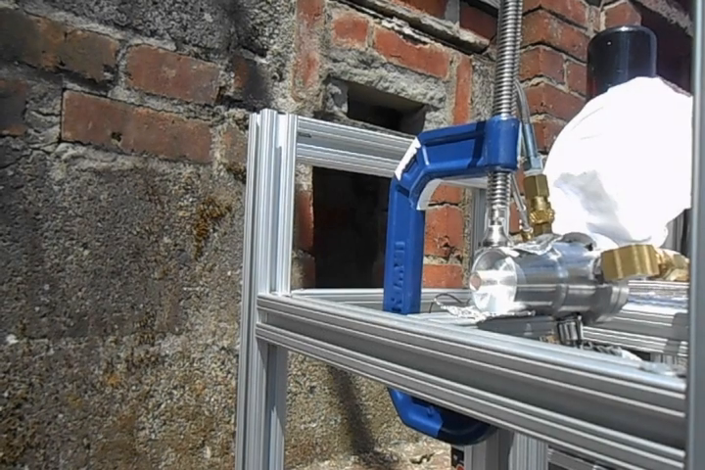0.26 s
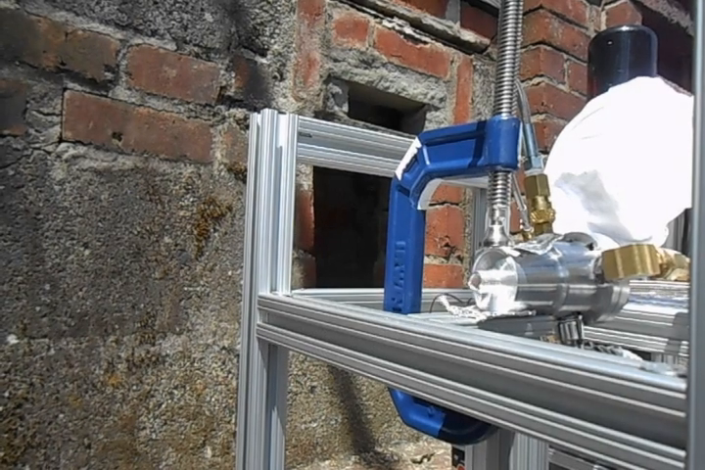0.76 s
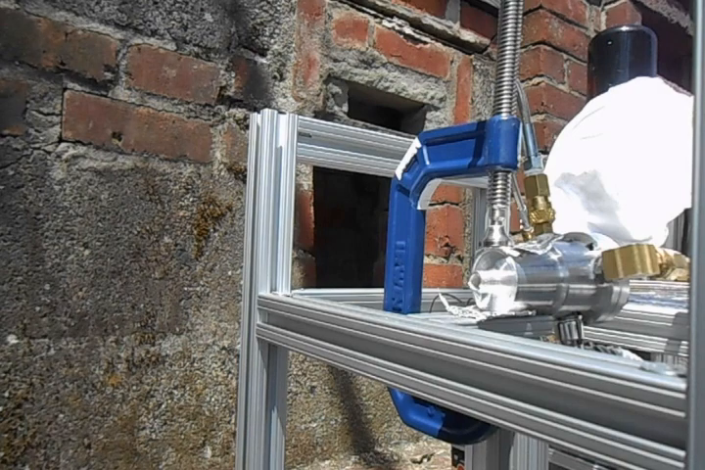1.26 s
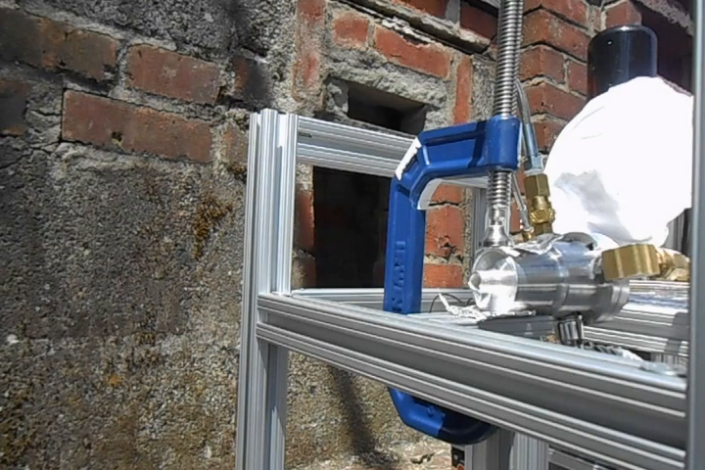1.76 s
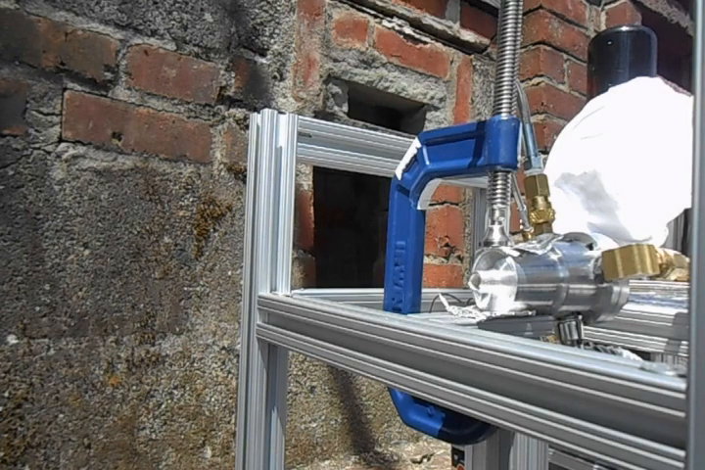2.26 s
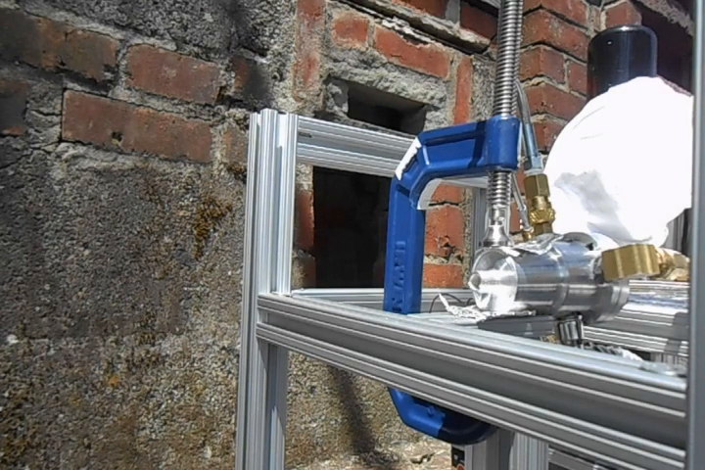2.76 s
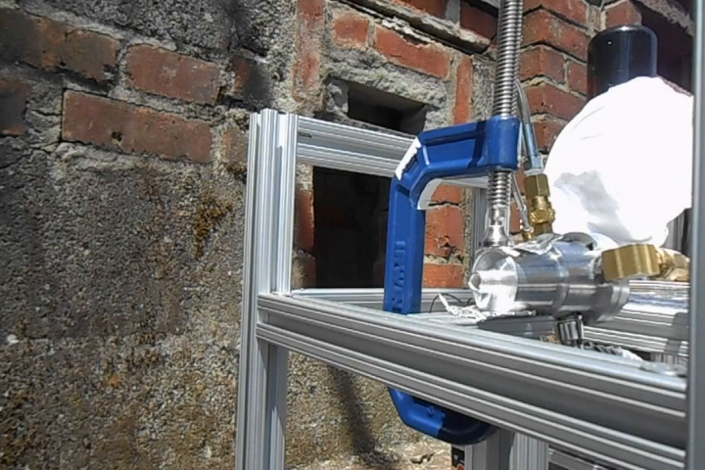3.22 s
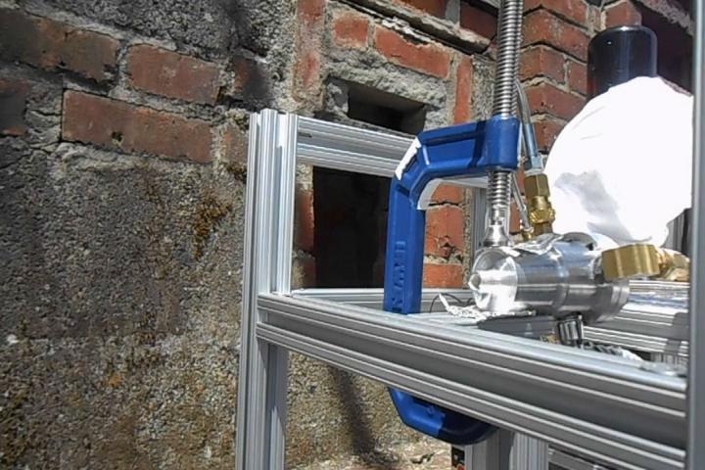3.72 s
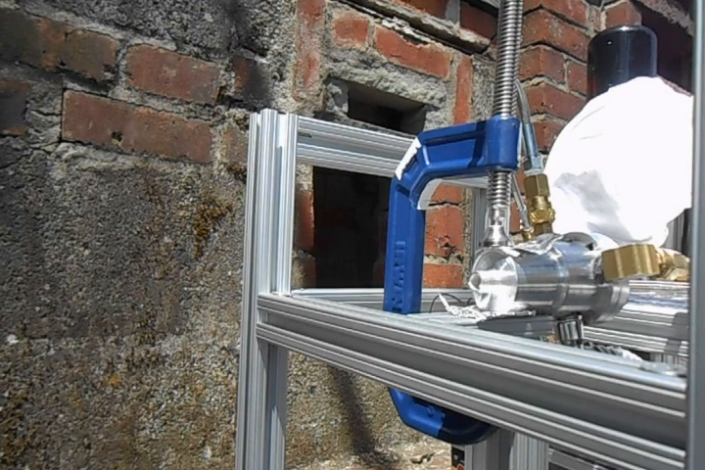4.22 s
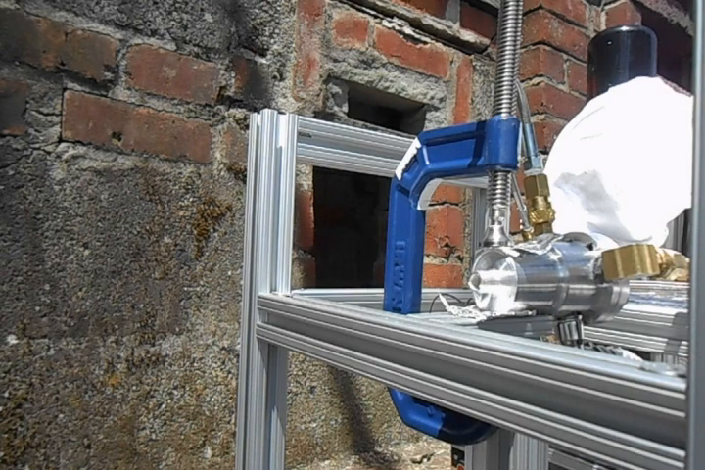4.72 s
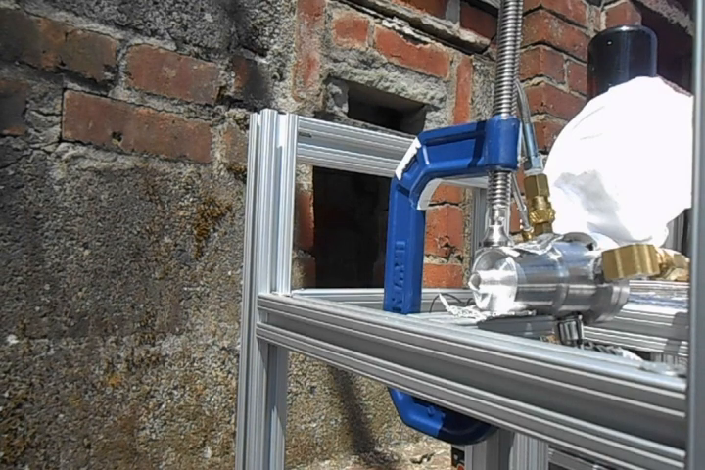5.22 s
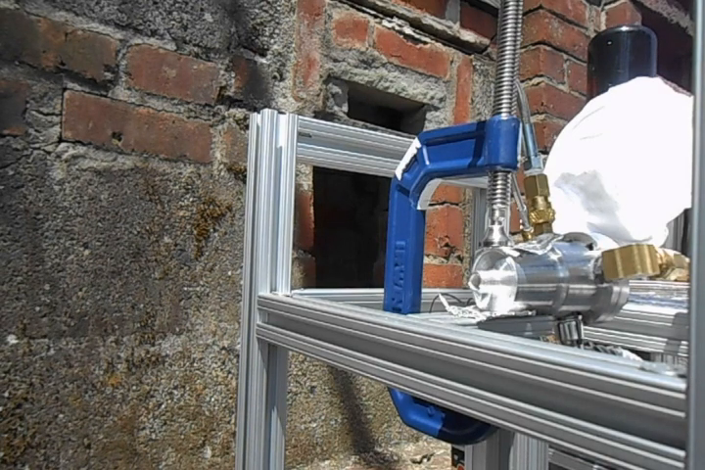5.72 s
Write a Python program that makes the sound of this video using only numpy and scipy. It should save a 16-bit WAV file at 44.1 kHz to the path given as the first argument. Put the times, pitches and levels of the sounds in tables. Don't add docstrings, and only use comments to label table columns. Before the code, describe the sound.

Outdoors, very close to a small gas igniter clamped to a metal frame. From 0 to 0.1 s a thin, bright electric spark buzzes steadily at a low rasping pitch over faint air noise. At 0.11 s a valve opens with a short hiss and chirp; at 0.14 s the gas lights with a thump and bursts into a loud, broadband roar, overloading the microphone. It brightens, then holds steady and harsh until about 1.2 s. From 1.25 to 1.5 s it narrows, growing rough, with piercing high whistles and spitting, and shuts. Near-silence follows; from 1.75 s distant wash and low wind swell back. A light pop at 2.0 s and a soft breathy sigh at 2.15 s precede clustered pops from 2.7 s. After 3.4 s, dry hollow knocks with a high chamber ring and gassy puffs repeat roughly every 0.2 s to the end at 6 s.

```python
import sys
import numpy as np
from scipy import signal
from scipy.fft import rfft, irfft
from scipy.io import wavfile

SR = 44100
rng = np.random.default_rng(int(sys.argv[2]) if len(sys.argv) > 2 else 0)


def rack_gain(trim_db):
    fader = np.asarray(trim_db, float)
    return 10 ** (fader / 20)


def materialize(psi):
    bounded = np.clip(np.atleast_2d(psi).T, -1, 1)
    quanta = np.round(bounded * 32767).astype(np.int16)
    wavfile.write(sys.argv[1], SR, quanta)


N = 263718
TIME = np.arange(N) / SR
BINS_HZ = np.maximum(np.fft.rfftfreq(N, 1 / SR), 1)
POP_LAG_S = .0017

# multiple_of_main_mode, blown_width_hz, blown_db, struck_db, t60_s
CHAMBER = [(.518, 60, -4, 0, 0.059), (.48, 90.5, -10, -3, 0.02), (.95, 60, -10.5, -3, 0.018),
           (1.0, 60, -0.5, 3, 0.038), (1.06, 50, -14, -6, 0.011), (1.245, 149, -16, 3, 0.035),
           (1.427, 149, -11, 5, .03), (1.5, 120, -10, 12, 0.015), (1.638, 130, -7, 3, 0.044),
           (1.957, 40, -45, -10, 0.03)]
# start_s, thud_db, thud_tilt_db_per_octave, low_mode_db, main_mode_db
POPS = [(2.016, -38.5, -3, -35, -44), (2.707, -33.5, -5, -35.5, -38), (2.807, -28, -9, -33, -36.5),
        (2.855, -47, -8, -46, -37), (2.901, -27.5, -9, -35, -36), (3.045, -24.5, -16, -30, -31.5),
        (3.124, -41, -10, -45, -33), (3.228, -24.5, -12, -34, -32), (3.309, -36, -4, -58, -43),
        (3.407, -22.5, -12, -26, -25), (3.619, -22.5, 5, -33, -27), (3.841, -21, 0, -36, -30.5),
        (4.037, -26, 7, -29.5, -32), (4.237, -25.5, -14, -29.5, -28), (4.442, -24, 3, -52, -26.5),
        (4.477, -44, 0, -42, -51), (4.648, -24.5, -6, -32.5, -39.5), (4.831, -24, -5, -30, -31),
        (5.056, -25, 0, -28, -31.5), (5.278, -22.5, 2, -34.5, -35), (5.479, -20.5, -11, -32, -32.5),
        (5.706, -23, -4, -33, -36.5), (5.747, -42, -2, -36, -55), (5.947, -20, -10.5, -31, -32.5)]


def rms_one(x):
    return x / np.sqrt(np.mean(x ** 2) + 1e-20)


def in_time(rows, outside=None):
    s, *columns = np.transpose(rows)
    return [np.interp(TIME, s, c, left=outside, right=outside) for c in columns]


def swell(s, length):
    return np.cos(np.pi * np.clip((TIME - s) / length, -.5, .5))


def drift(rate_hz):
    r = np.exp(-2 * np.pi * rate_hz / SR)
    wander = signal.lfilter([1], [1, -2 * r, r * r], rng.standard_normal(N + SR))
    return rms_one(wander[SR:])


def noise_bands(spectrum, peaks, edges_hz):
    hz, db = np.transpose(spectrum)
    shape_db = np.interp(np.log(BINS_HZ), np.log(hz), db)
    for centre_hz, width_hz, peak_db in peaks:
        shape_db = shape_db + peak_db / (1 + (2 * (BINS_HZ - centre_hz) / width_hz) ** 2)
    noise = rfft(rng.standard_normal(N)) * rack_gain(shape_db)
    below = [0] + [1 / (1 + (BINS_HZ / edge) ** 4) for edge in edges_hz] + [1]
    return [rms_one(irfft(noise * (high - low), N)) for low, high in zip(below, below[1:])]


def blown(hz, width_hz):
    turn = 2 * np.pi * np.cumsum(hz) / SR
    return drift(width_hz) * np.cos(turn) + drift(width_hz) * np.sin(turn)


def jet():
    # hz, level_db_per_hz
    jet_spectrum = [(21, -32), (35, -2), (143, -14.5), (282, -7.5), (368, -8.5), (542, -6), (597, -8),
                    (743, -7), (2010, -6.5), (3110, -2.5), (4470, 2), (6750, -6), (9020, -4.5),
                    (11500, -14), (15000, -47.5), (22000, -120)]
    # centre_hz, width_hz, level_db
    nozzle = [(4620, 460, 0), (6240, 150, 1), (8970, 440, 1)]
    edges_hz = [250, 2000, 8000]
    # time_s, level_db
    flow = [
        (0.137, -9.5),
        (0.245, -13),
        (0.549, -23),
        (1.203, -22.5),
        (1.331, -28),
        (1.411, -43),
        (1.465, -45.5),
        (1.489, -76.5),
        (1.525, -90),
    ]
    # centre_s, length_s, level_db
    coughs = [
        (1.425, 0.011, 9.5),
        (1.431, 0.013, -16),
    ]
    # centre_s, length_s, height
    surges = [
        (.1495, .003, -1.2),
        (.1865, .0075, -4.0),
        (.1912, .0055, 5.0),
        (.2132, .005, 2.0),
        (1.33, .02, .07),
        (1.345, .022, .09),
        (1.433, .03, -.035),
    ]
    cold_s, light_s = .114, .137
    rumble, roar, hiss, top = noise_bands(jet_spectrum, nozzle, edges_hz)

    filling = np.clip((TIME - cold_s) / (light_s - cold_s), 0, 1)
    cold = (cold_s, light_s, -30.5, -2.5, -12.5, 10 - 14 * filling)

    flow_db, = in_time(flow)
    early = np.exp(-np.maximum(TIME - light_s, 0) / 0.098)
    steady_db, starved_most_db = -25, 20
    starved_db = np.clip(steady_db - flow_db, 0, starved_most_db) * (TIME > 1)
    lit_db = flow_db - 0.5 + sum(db * swell(s, length) for s, length, db in coughs)
    lit_rumble_db = -11.5 + 14 * swell(.195, 0.06) + .3 * starved_db
    lit_roar_db = -6 + 6 * early + 0.36 * starved_db
    lit_top_db = 0.5 - 26 * early - 5.5 * starved_db
    lit = (light_s, flow[-1][0], lit_db, lit_rumble_db, lit_roar_db, lit_top_db)

    out = np.zeros(N)
    for start, end, hiss_db, rumble_db, roar_db, top_db in (cold, lit):
        mix = hiss * rack_gain(0.51 * drift(30))
        mix += rumble * rack_gain(rumble_db)
        mix += roar * rack_gain(roar_db + 0.5 * drift(20))
        mix += top * rack_gain(top_db + 0.73 * drift(30))
        out += ((TIME >= start) & (TIME < end)) * rack_gain(hiss_db) * mix
    for s, length, height in surges:
        out += height * swell(s, length) ** 2
    return out


def valve():
    # time_s, level_db, upper_mode_lead_db
    whistle = [
        (1.26, -30, -12.5),
        (1.272, -14, -9.5),
        (1.305, -21, 9.5),
        (1.412, -34, 2.5),
        (1.424, -12, -12),
        (1.435, -38, -14),
        (1.443, -29.5, -12.5),
        (1.466, -33, -14),
        (1.485, -78, 1),
    ]
    whistle_hz = [5470, 5810]
    # time_s, rate_per_s, level_db
    sputter = [
        (1.25, 200, -15),
        (1.33, 450, -12),
        (1.37, 450, -17),
        (1.41, 350, -25),
        (1.47, 200, -38),
    ]
    tone_db, lead_db = in_time(whistle)
    ring_db = -110 * np.maximum(TIME - whistle[-1][0], 0)
    tone_db = np.where(TIME < whistle[0][0], -150, tone_db + ring_db)
    low, high = (blown(hz + 7.0 * lead_db, 110.0) for hz in whistle_hz)
    modes = rack_gain(np.minimum(-lead_db, 0)) * low + rack_gain(np.minimum(lead_db, 0)) * high
    tone = rack_gain(tone_db - 5.0 + 3.7 * drift(50)) * modes

    per_s, spit_db = in_time(sputter, outside=-150)
    spits = (rng.random(N) < per_s / SR) * rack_gain(spit_db + 6.1 * rng.standard_normal(N))
    dull = signal.butter(1, 3000, fs=SR, output="sos")
    octave = 1.5 * tone ** 2
    return tone - octave - 3 * signal.sosfilt(dull, spits)


def spark():
    # pitch_hz, level_db
    partials = [(2051, -55), (2283, -60), (4107, -44), (4334, -57), (4565, -58), (4791, -58), (5023, -58),
                (5249, -54), (5480, -48), (5938, -48), (6164, -37), (6223, -63), (6390, -54), (6621, -43),
                (6848, -46), (7079, -55), (7300, -64), (7531, -59), (7763, -53), (7989, -53), (8215, -49),
                (8446, -54), (8672, -64), (8899, -65), (9130, -50), (9356, -57), (9588, -64), (9814, -52),
                (10045, -50), (10271, -56)]
    strike_hz, end_s = 228.3, .107
    multiple = np.arange(8, 49)
    level_db = -68 + 2.0 * rng.standard_normal(len(multiple))
    for hz, db in partials:
        near = multiple == round(hz / strike_hz)
        level_db[near] = np.maximum(level_db[near], db + hz / 2400)
    t = TIME[TIME < end_s]
    multiple = multiple[:, None]
    phase = np.pi + .012 * (multiple - 27) ** 2 + .8 * rng.standard_normal((len(multiple), 1))
    waves = np.sin(2 * np.pi * strike_hz * multiple * (t - .0005) + phase)
    tone = np.sqrt(2) * rack_gain(level_db) @ waves
    return np.pad(tone * np.minimum((end_s - t) / 0.0005, 1), (0, N - len(t)))


def crack_db(thud_db):
    return -31 + 0.56 * thud_db


def mode_hz(multiple):
    # time_s, pitch_hz
    cooling = [(1.5, 4415), (2.0, 4575), (2.7, 4478), (3.5, 4427), (4.5, 4386), (6, 4243)]
    fitting_hz = 4410.0
    return multiple * (in_time(cooling)[0] if multiple < 1.2 else np.full(N, fitting_hz))


def pops():
    # pitch_hz, level_db, t60_s
    stand = [(370.5, 0.5, 0.054), (450.7, -3.5, 0.098), (576, -8, 0.048), (623.3, -10, 0.092),
             (842, -18, 0.043)]
    out, t = np.zeros(N + SR), np.arange(SR // 8) / SR
    pitches = [mode_hz(row[0]) for row in CHAMBER]
    chance = rng.standard_normal((len(POPS), 2, len(stand) + len(CHAMBER)))
    puffs = rng.standard_normal((len(POPS), len(t)))
    rise = 1 - np.exp(-t / .00012)
    for (s, thud_db, tilt_db, low_db, main_db), (odds, offs), puff in zip(POPS, chance, puffs):
        at = round((s + POP_LAG_S) * SR)
        pop = -rack_gain(thud_db - 2) * np.exp(-t / 0.0001)
        for (hz, db, t60), odd, off in zip(stand, odds, offs):
            struck_db = thud_db + db + 0.5 + tilt_db * np.log2(hz / 420) + 1.0 * odd
            ring = np.sin(2 * np.pi * hz * (1 + 0.027 * off) * t + 0.92)
            pop -= rack_gain(struck_db - 60 * t / t60) * ring
        chamber_chance = zip(CHAMBER, pitches, odds[len(stand):], offs[len(stand):])
        for (multiple, _, _, db, t60), hz, odd, off in chamber_chance:
            group_db = low_db if multiple < .7 else main_db if multiple < 1.2 else crack_db(thud_db)
            ring = np.sin(2 * np.pi * (1 + 0.014 * off) * hz[at] * t)
            pop -= rack_gain(group_db + db + 2.0 + 2.4 * odd - 60 * t / t60) * ring
        pop += puff * rack_gain(crack_db(thud_db) + 13.5 - 60 * t / 0.02)
        out[at:at + len(t)] += pop * rise
    return signal.sosfilt(signal.butter(2, [205, 6500], "band", fs=SR, output="sos"), out[:N])


def afterflow(level_db, t60):
    kicks = np.zeros(N)
    kicks[[round((row[0] + POP_LAG_S) * SR) for row in POPS]] = rack_gain(level_db)
    return signal.lfilter([1], [1, -rack_gain(-60 / (t60 * SR))], kicks)


def edge_tones():
    # centre_s, length_s, pitch_hz, level_db
    whistles = [
        (0.113, .012, 6150, -38),
        (0.128, 0.014, 4100, -21.5),
        (2.157, .14, 1330, -52.5),
        (2.142, 0.13, 3330, -61),
        (2.15, .14, 2700, -57),
    ]
    return sum(rack_gain(db) * swell(s, length) * blown(np.full(N, float(hz)), 40)
               for s, length, hz, db in whistles)


def open_air():
    # time_s, air_db, wind_db
    before = [
        (0, -39, -44),
        (.104, -38.5, -42),
        (.108, -50, -57.5),
        (.114, -47, -66.5),
    ]
    # time_s, air_db
    recovery = [(1.48, -73), (1.546, -85), (1.752, -71), (1.874, -56), (2.0, -46.5), (2.71, -39.5),
                (3.3, -39), (3.6, -46), (5.0, -48), (5.36, -44.5), (5.6, -48.5), (5.98, -44.5)]
    # hz, level_db_per_hz
    air_spectrum = [(59, -37.5), (100, -5.5), (265, -1), (452, 0), (530, -10), (646, 1.5), (1610, -18),
                    (2210, -12.5), (3230, -26.5), (4430, -17.5), (5000, -27), (7280, -24.5), (8210, -30),
                    (11500, -34), (15000, -69.5), (22000, -120)]
    # centre_hz, width_hz, level_db
    air_peaks = [(351, 10, 7), (640, 77, 0.5), (1935, 730, 6.5), (2700, 30, 5.5), (7800, 53, 8.5),
                 (9020, 390, 7), (9770, 350, 8)]
    # centre_s, length_s, level_db
    gusts = [
        (4.481, 0.066, -63),
        (4.685, 0.071, -53),
        (5.0, 0.024, -67),
        (5.312, 0.045, -43),
        (5.498, 0.084, -61),
        (5.975, .05, -54),
    ]
    wind = rng.standard_normal(N)
    wind = rms_one(signal.sosfilt(signal.butter(2, [22, 130], "band", fs=SR, output="sos"), wind))
    air, leak = noise_bands(air_spectrum, air_peaks, [3500])
    air_db, wind_db = in_time(before, outside=-150)
    out = rack_gain(air_db) * (air + rack_gain(-13.5) * leak) + rack_gain(wind_db) * wind

    air_db, = in_time(recovery, outside=-150)
    settled_db = -47
    swing_db = air_db - settled_db
    wind_db = -48 + 0.85 * swing_db
    out += rack_gain(air_db + 0.5 + 1.08 * drift(27)) * air
    out += rack_gain(wind_db + 2.0 * drift(1.7)) * wind

    vent_s, vent_end_s = 3, 3.42
    venting = (TIME > vent_s) & (TIME < vent_end_s)
    leak_db = -62.5 + 1.03 * swing_db + 0.5 * venting
    flutter_db = 2.6 * drift(16.0)
    _, thud_db, _, _, main_db = np.transpose(POPS)
    rush = rack_gain(-6.0) * afterflow(crack_db(thud_db), t60=0.21)
    out += (rack_gain(leak_db + 4.5 + .5 * flutter_db) + rush) * leak
    gust = signal.sosfilt(signal.butter(4, 8800, fs=SR, output="sos"), leak)
    for s, length, gust_db in gusts:
        out += rack_gain(gust_db) * swell(s, length) * gust

    breath = rack_gain(-58 + 1.13 * swing_db + 2.5 * venting) + rack_gain(-14.5) * afterflow(main_db, t60=0.14)
    for multiple, width_hz, blown_db, _, _ in CHAMBER:
        shy_db = -6.0 * (multiple > 1.2 and multiple != 1.5) * (TIME < vent_s)
        sigh = blown(mode_hz(multiple), width_hz / 2)
        out += rack_gain(blown_db + 0.56 * flutter_db + shy_db) * breath * sigh
    return out


def scene():
    return (jet() + valve() + spark() + pops() + edge_tones() + open_air())[None]


def roll_off(x):
    return signal.sosfilt(signal.butter(12, 17850, fs=SR, output="sos"), x)


def record(dry):
    # time_s, top, bottom
    ceiling = [(.44, .29, .29), (.49, .21, .26), (1.25, .22, .26), (1.31, .17, .25), (1.39, .07, .2),
               (1.5, .07, .2), (1.9, .29, .29)]
    # time_s, height
    sag = [
        (1.4, 0),
        (1.46, -.004),
        (1.595, -.0036),
        (1.5952, -.0024),
        (1.9, 0),
    ]
    top, bottom = in_time(ceiling)
    dry = signal.sosfilt(signal.butter(8, 10800, fs=SR, output="sos"), dry)
    over = np.abs(dry) / np.where(dry > 0, top, bottom)
    clipped = dry / (1 + over ** 6) ** (1 / 6) + in_time(sag, outside=0)[0]
    joined = np.interp(TIME, TIME[::2], clipped[0, ::2])[None]
    band_limit = signal.cheby2(12, 30, 16650, fs=SR, output="sos")
    limited = signal.sosfiltfilt(band_limit, joined)
    return roll_off(limited)


dry = scene()
out = record(dry)
materialize(out)
```